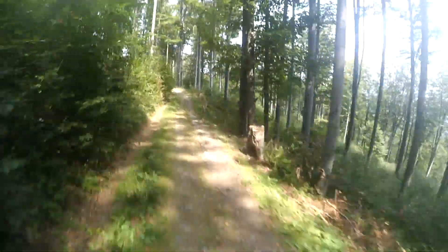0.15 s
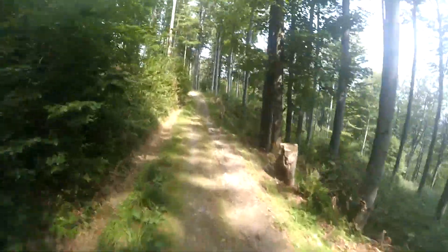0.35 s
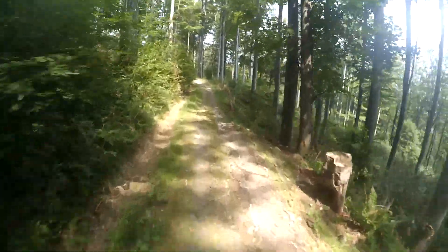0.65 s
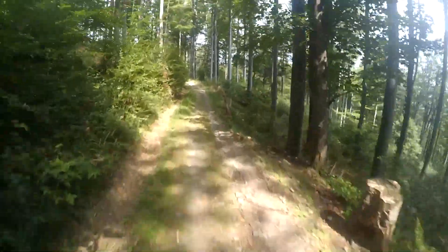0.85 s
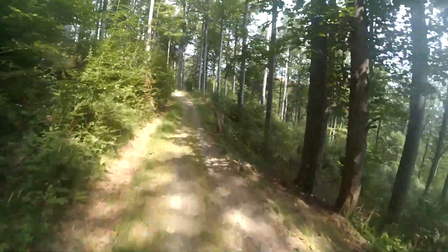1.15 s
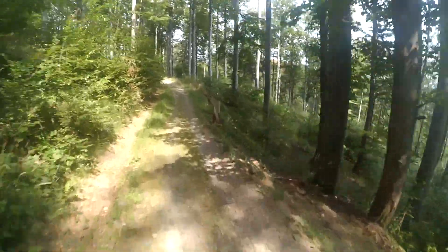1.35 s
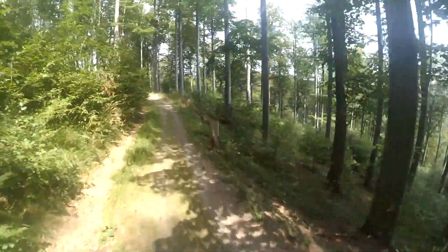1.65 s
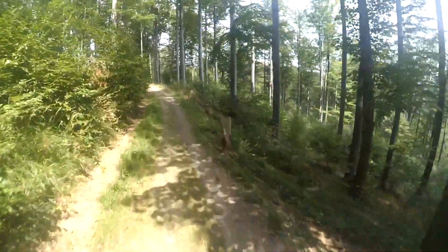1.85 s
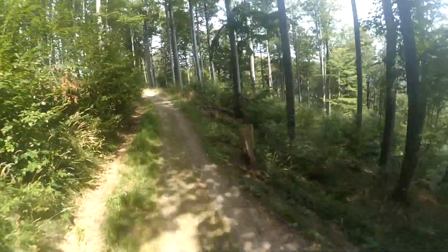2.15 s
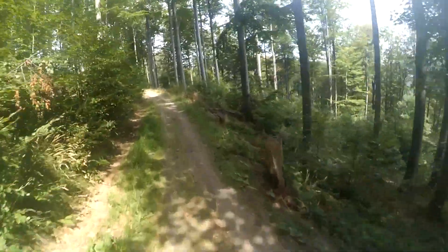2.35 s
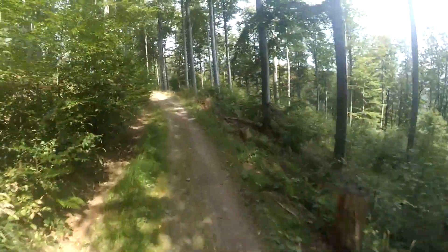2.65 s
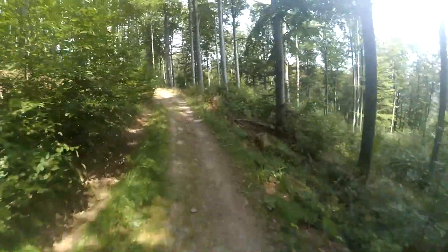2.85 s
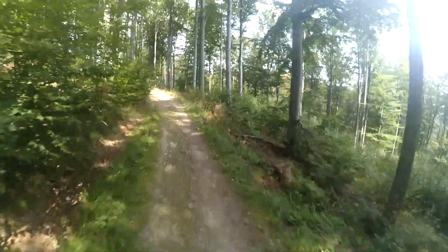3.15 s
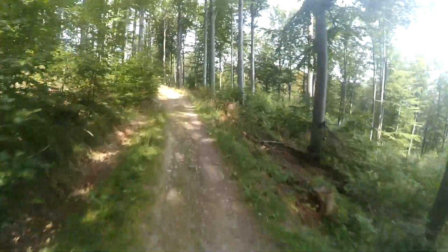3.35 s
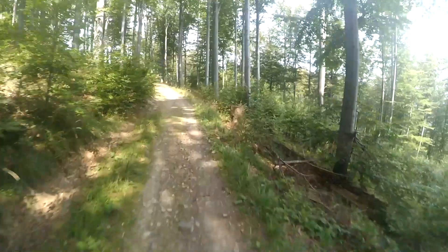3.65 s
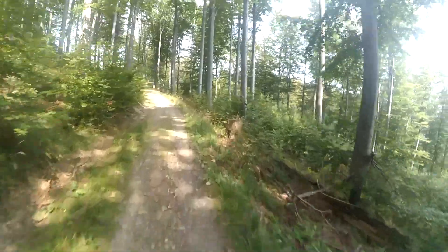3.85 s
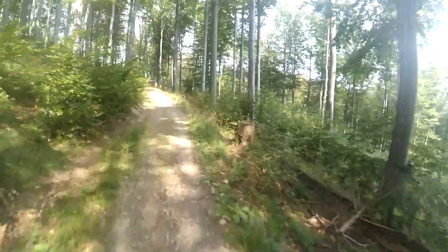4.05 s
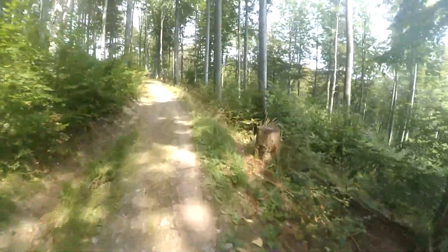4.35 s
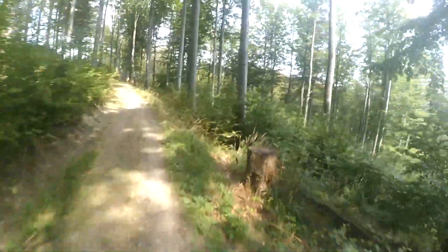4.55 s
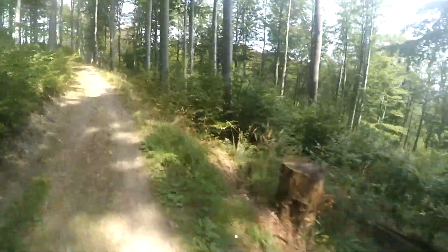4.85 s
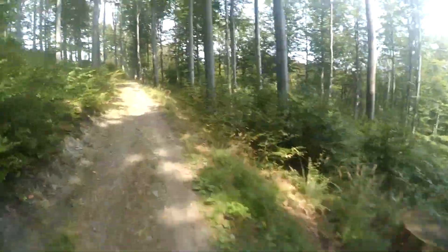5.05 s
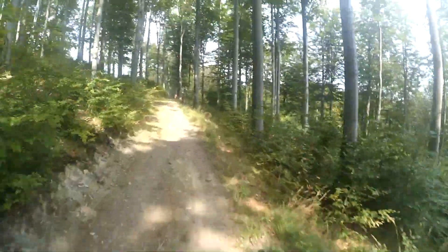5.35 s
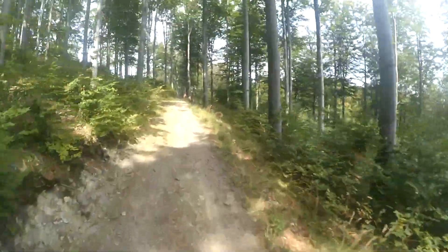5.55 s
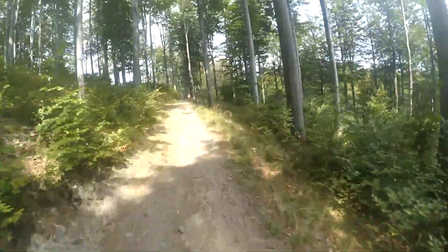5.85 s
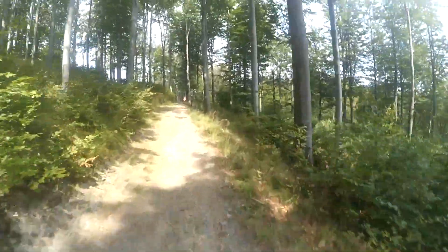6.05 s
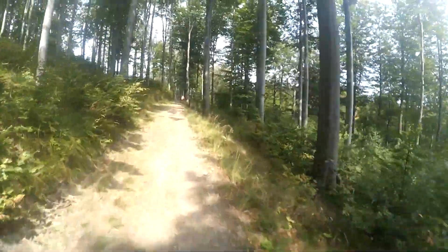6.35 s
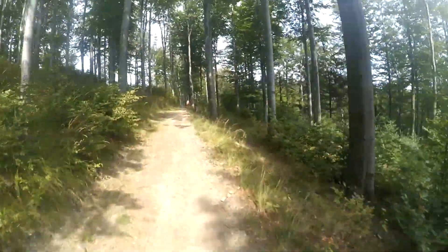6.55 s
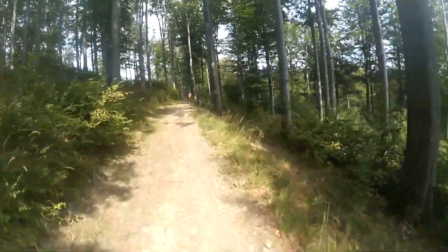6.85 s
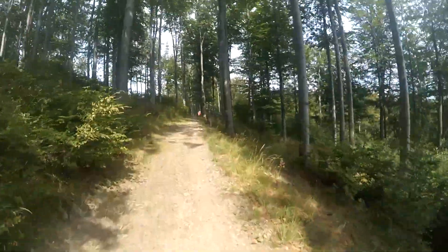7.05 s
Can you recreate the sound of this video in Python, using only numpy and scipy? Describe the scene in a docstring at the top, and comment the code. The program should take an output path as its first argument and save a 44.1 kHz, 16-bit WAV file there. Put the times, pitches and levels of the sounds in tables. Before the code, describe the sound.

Muffled tyre roar on gravel, with small knocks, pings and bumps from a moving mountain bike and deep wind buffeting underneath.

```python
"""On a gravel trail, a mountain bike rolls downhill, heard from inside a closed plastic case fixed to it.
Knobbly tyres roar on the grit, and the case colours that roar with its own ringing pitches.
Loose stones and parts knock, tick and ping, and bumps jolt the case. Underneath, wind rumbles and the
mount that holds the case sways and shudders, mostly too low to hear.
In the background are a soft hiss and a faint bright chirr that comes and goes at uneven gaps."""
import sys
import numpy as np
from scipy import signal
from scipy.fft import rfft, irfft
from scipy.io import wavfile
from scipy.ndimage import uniform_filter1d

SR = 44100
rng = np.random.default_rng(int(sys.argv[2]) if len(sys.argv) > 2 else 0)


def dump(signal):
    """Clip the signal to [-1, 1] and save it as 16-bit WAV at the path in sys.argv[1]."""
    limited = np.clip(np.atleast_2d(signal).T, -1, 1)
    pcm = np.round(limited * 32767).astype(np.int16)
    wavfile.write(sys.argv[1], SR, pcm)


N = 317564   # samples: about 7.2 seconds


def from_db(db):
    """Turn decibels into a number to multiply by."""
    return 10 ** (np.asarray(db) / 20)


def rms_one(x):
    """Scale a signal so that its average strength (rms) is 1."""
    return x / np.sqrt(np.mean(x ** 2) + 1e-20)


def curves(rows):
    """Join a table's timed points with straight lines: one curve for each column after the time."""
    times, *columns = np.transpose(rows)
    return [np.interp(np.arange(N) / SR, times, column) for column in columns]


def drift(rate_hz):
    """A smooth random wander of about 1 either way; a higher rate wanders faster."""
    r = np.exp(-80 * np.pi * rate_hz / SR)
    slow = signal.lfilter([1], [1, -2 * r, r * r], rng.standard_normal(N // 40 + 2002))[2000:]
    return np.interp(np.arange(N) / 40, np.arange(len(slow)), rms_one(slow))


def colour(x, spectrum, rings=()):
    """Shape a sound's lows and highs to a spectrum, with a boost at each ringing pitch."""
    size = 16384
    hz = np.arange(size // 2 + 1) * SR / size + 1
    hz_points, db_points = np.transpose(spectrum)
    db = np.interp(np.log(hz), np.log(np.r_[1, hz_points, SR]), np.r_[-120, db_points, db_points[-1] - 20])
    for centre_hz, width_hz, boost_db in rings:
        db += boost_db / (1 + (2 * (hz - centre_hz) / width_hz) ** 2)
    # Make the filter ring only after a click, never before it (minimum phase).
    cepstrum = irfft(np.log(from_db(db)))
    cepstrum[1:size // 2] *= 2
    cepstrum[size // 2 + 1:] = 0
    response = irfft(np.exp(rfft(cepstrum)))
    return signal.fftconvolve(x, response / np.sqrt(np.sum(response ** 2)))[:len(x)]


def ring(x, hz, width_hz):
    """Make a sound ring near one pitch; a smaller width rings longer."""
    r = np.exp(-np.pi * width_hz / SR)
    feedback = [1, -2 * r * np.cos(2 * np.pi * hz / SR), r * r]
    return signal.lfilter(np.array([1, 0, -1]) * (1 - r * r) / 2, feedback, x)


def ring_twice(x, hz, width_hz):
    """Two rings in a row let less through on either side of the pitch."""
    return ring(ring(x, hz, width_hz), hz, width_hz)


def grains(per_s, spread_db):
    """Random clicks of uneven size."""
    sizes = from_db(spread_db * np.minimum(rng.exponential(1, N), 5)) * rng.choice([-1, 1], N)
    return rms_one(sizes * (rng.random(N) < per_s / SR))


# The tone of the hiss: (pitch [Hz], relative level [dB])
HISS_SPECTRUM = [(3000, 4), (5000, 7.5), (8000, 0), (12500, -5), (13100, -46), (15000, -36)]

def hiss(effort_db):
    """Air, fine grit and the microphone hiss softly, louder when the tyres work harder."""
    slow_db = uniform_filter1d(effort_db, size=20000)
    level_db = -76 + 0.93 * (slow_db - slow_db.mean()) + 2 * drift(13)
    return from_db(level_db) * colour(rng.standard_normal(N), HISS_SPECTRUM)


# When the chirr sounds: (start [s], length [s], level [dB])
CHIRR_SPELLS = [(.148, 0.087, -79), (.298, .097, -77), (.468, 0.1, -76), (0.658, .1, -77),
                (0.785, 0.12, -71.5), (1.045, .09, -78), (1.198, .09, -78), (1.358, 0.083, -78),
                (1.578, .04, -83), (1.76, .035, -83), (1.955, 0.029, -83), (2.148, 0.033, -79),
                (2.3, .045, -78), (2.48, .035, -78), (2.695, .06, -79), (2.865, .04, -81),
                (3.088, .035, -78), (3.238, .045, -81), (3.468, .04, -83), (3.648, .03, -78),
                (3.946, .04, -78), (4.03, .035, -79), (4.188, .035, -79), (4.37, .06, -79),
                (4.548, 0.11, -76), (4.748, .097, -78), (4.948, .095, -76), (5.148, .09, -76),
                (5.338, .097, -76), (5.51, 0.084, -76), (5.652, .095, -75), (5.888, .085, -76),
                (6.038, .025, -82), (6.275, .045, -79), (6.44, .05, -81), (6.658, .045, -81),
                (6.828, .05, -78), (7.038, .035, -79)]
# Its bright rings: (pitch [Hz], width [Hz], relative level [dB], base level between chirrs [dB])
CHIRR_RINGS = [(7030, 340, -1.5, -84), (8270, 610, -3, -81.5), (9340, 650, -6, -87),
               (11050, 500, -2.5, -83), (11950, 720, -1, -88.5), (13700, 1000, 1, -105)]

def chirr():
    """Short, ragged runs of tiny clicks ring at several high pitches, each flickering on its own."""
    gate = np.zeros(N)
    for start, length, db in CHIRR_SPELLS:
        gate[round(start * SR):round((start + length) * SR)] = from_db(db)
    gate = uniform_filter1d(gate, size=300)   # soften each start and stop
    clicks = from_db(2 * drift(45)) * grains(per_s=2500, spread_db=1.8)
    out = np.zeros(N)
    for hz, width_hz, db, rest_db in CHIRR_RINGS:
        flicker = from_db(db - 5.5 + 1.5 * drift(40))
        out += (gate + from_db(rest_db)) * flicker * rms_one(ring_twice(clicks, hz, width_hz))
    return out


# Gusts of wind that hit the case: (time [s], level [dB])
WIND_GUSTS = [(0.02, -34), (0.14, -52), (0.2, -51), (0.38, -31), (0.46, -47), (0.63, -39), (0.67, -50),
              (0.69, -47), (0.81, -32), (0.93, -47), (0.97, -38), (1.09, -42), (1.15, -50), (1.27, -44),
              (1.49, -43.5), (1.53, -33), (1.61, -45), (1.75, -35), (1.83, -54), (2.02, -42), (2.18, -52),
              (2.22, -43), (2.26, -55), (2.32, -38), (2.46, -53), (2.56, -42), (2.62, -52), (2.72, -40),
              (2.76, -47), (2.8, -41), (3.14, -52), (3.18, -41), (3.33, -46), (3.81, -58), (3.85, -41),
              (4.13, -67), (4.29, -46), (4.69, -48), (4.81, -42), (4.87, -50), (4.98, -51), (5.02, -38),
              (5.1, -51), (5.22, -42), (5.44, -51), (5.72, -47), (5.82, -61), (5.88, -45), (5.92, -56),
              (6.13, -46), (6.17, -58), (6.21, -44), (6.37, -57), (6.41, -48), (6.57, -48), (6.83, -42.5),
              (6.87, -52), (6.93, -47), (6.97, -53), (7.15, -45)]

def wind():
    """Gusts shake the mount at a deep pitch of its own."""
    gust_db, = curves(WIND_GUSTS)
    shaking = ring_twice(rng.standard_normal(N), hz=40.7, width_hz=28)
    return from_db(gust_db - 2.5) * rms_one(shaking)


# The tone of the rumble: (pitch [Hz], relative level [dB])
RUMBLE_SPECTRUM = [(12, -13), (22, -8), (40, -10), (55, -11), (75, -9.5), (128, -13), (205, -24.5),
                   (348, -29.5), (420, -43), (550, -79)]

def rumble(level_db):
    """Wind and the bike's frame make a low, lumpy noise."""
    lumps = from_db(0.68 * drift(34)) * rng.standard_normal(N)
    return from_db(level_db) * rms_one(colour(lumps, RUMBLE_SPECTRUM, rings=[(121, 25, 6.1)]))


# Thuds as the wheels take a bump: (time [s], peak level [dB])
WHEEL_THUDS = [(0.088, -16), (.27, -20), (.36, -21.5), (.53, -25), (.64, -21.5), (.73, -36), (.82, -19),
               (1.04, -18), (1.26, -31), (1.5, -29), (1.74, -31), (1.88, -38), (2.02, -30), (2.19, -21),
               (2.36, -23), (2.48, -22), (2.6, -34), (2.72, -25.5), (2.82, -21.5), (2.92, -29), (3.17, -23),
               (3.4, -27.5), (3.93, -33), (4.15, -31.5), (4.33, -20), (4.53, -31), (4.66, -31), (4.8, -25),
               (5.15, -24), (5.24, -24), (5.35, -28), (5.62, -43), (5.94, -49), (6.08, -25), (6.239, -32),
               (6.401, -24), (6.77, -23), (7.1, -30)]

def shudder_level(rest_db=-42, rise_db_per_s=288.5, fall_db_per_s=299):
    """How hard the mount shudders, in dB: each thud swells fast and dies back to a faint tremble."""
    t = np.arange(0, N + 100, 100) / SR
    power = from_db(2 * rest_db)   # doubling the dB gives power, which can be added up
    for time, peak_db in WHEEL_THUDS:
        below_peak_db = np.maximum(rise_db_per_s * (time - t), fall_db_per_s * (t - time))
        power = power + from_db(2 * (peak_db - below_peak_db))
    return np.interp(np.arange(N) / SR, t, 10 * np.log10(power))


def wobble(hz, wander, wander_hz):
    """A spring swings near its own pace while uneven ground pushes it faster and slower."""
    pace_hz = hz * np.exp(wander * drift(wander_hz))
    return np.sqrt(2) * np.sin(2 * np.pi * (np.cumsum(pace_hz) / SR + rng.random()))


# How hard the mount moves: (time [s], sway level [dB], rumble level [dB])
MOUNT_LEVELS = [(0.04, -14, -46.5), (0.17, -21.5, -57.5), (0.34, -11, -48), (0.5, -17.5, -49.5),
                (0.75, -17.5, -48.5), (0.83, -14, -48), (0.97, -22.5, -49.5), (1.05, -8, -58),
                (1.15, -21, -53), (1.37, -27.5, -54), (1.46, -13, -53), (1.54, -14.5, -66),
                (1.63, -30.5, -49.5), (1.74, -13, -62), (1.84, -27.5, -57), (2.28, -10.5, -55),
                (2.34, -23, -58.5), (2.63, -20, -52.5), (2.69, -35.5, -53.5), (2.79, -19.5, -51),
                (3.25, -23, -50), (3.46, -45.5, -53), (3.66, -30.5, -48), (3.96, -19, -59),
                (4.06, -38.5, -51.5), (4.22, -31.5, -56), (4.3, -26, -50), (4.4, -20.5, -53),
                (4.73, -20.5, -54), (4.83, -15, -41.5), (4.95, -22, -58), (5.23, -15, -48),
                (5.35, -39, -60), (5.39, -22, -53.5), (5.72, -24.5, -55), (5.93, -33, -54),
                (6.2, -26.5, -52.5), (6.42, -27, -53.5), (6.52, -31.5, -60.5), (6.63, -17.5, -53),
                (6.73, -22, -55), (6.9, -22, -51), (7.15, -21, -62.5)]

def mount(travel=0.46):
    """The springy mount lurches, sways and shudders, with the wind and the rumble on top."""
    sway_db, rumble_db = curves(MOUNT_LEVELS)
    rumble_db += drift(6.8)   # the drifts here are the unevenness of the ground
    shudder_db = shudder_level() + 2.5 * drift(22)
    quick_db = shudder_db - uniform_filter1d(shudder_db, size=20000)   # the shudder's fast changes
    sway_db += 0.3 * quick_db + 1.5 * drift(8.6)
    rumble_db += 0.11 * quick_db
    lurch = from_db(-6) * rms_one(ring_twice(rng.standard_normal(N), hz=7.04, width_hz=5.7))
    sway = wobble(hz=10.5, wander=0.2, wander_hz=2.96)
    shudder = wobble(hz=22.48, wander=0.27, wander_hz=5.88)
    swing = from_db(sway_db) * (sway + lurch) + from_db(shudder_db) * shudder
    swing = travel * np.tanh(swing / travel)   # it rounds off near the end of its travel
    swing = signal.sosfilt(signal.butter(4, 34, fs=SR, output="sos"), swing)   # its mass smooths it
    return swing + wind() + rumble(rumble_db)


# Bumps: (time [s], level [dB], direction [+1 or -1], length [s], level of the frame's ring [dB])
BUMPS = [(.3385, -55, -1, .003, -40), (0.366, -26, 1, 0.0016, -65), (0.526, -31, 1, 0.0041, -34),
         (.6253, -31, 1, 0.0069, -40), (.8225, -25.5, 1, 0.0039, -47), (1.0571, -26, 1, 0.0027, -33),
         (1.547, -36.5, 1, 0.0034, -39), (1.7314, -29, 1, 0.0034, -38.5), (2.22, -38, 1, 0.0023, -35.5),
         (2.322, -36.5, 1, 0.0027, -66), (4.8095, -27.5, -1, 0.0034, -19), (5.232, -27, 1, 0.003, -49),
         (6.828, -35, 1, 0.0037, -65)]
# How the frame rings after a bump: (pitch [Hz], time to fade by 60 dB [s], relative level [dB])
FRAME_RINGS = [(140.5, 0.14, -12), (346, 0.097, -19)]

def jolts():
    """The case hits its stop: the pressure builds, flips quickly and settles, and the frame rings on."""
    out, blows = np.zeros(N), np.zeros(N)
    t = np.arange(-1000, 1000) / SR
    for time, db, direction, length, ring_db in BUMPS:
        at = round(time * SR)
        flip = np.tanh(t / (0.25 * length)) * np.exp(-np.abs(t) / length)
        out[at - 1000:at + 1000] += direction * from_db(db) * flip
        blows[at] = direction * from_db(ring_db)
    for hz, fade_s, db in FRAME_RINGS:
        r, angle = from_db(-60 / (fade_s * SR)), 2 * np.pi * hz / SR
        ringing = signal.lfilter([0, np.sin(angle)], [1, -2 * r * np.cos(angle), r * r], blows + 1e-18)
        out += from_db(db) * ringing
    return out


# Stones that hit the frame: (time [s], pitch [Hz], level [dB], time to fade by 60 dB [s])
STONE_PINGS = [(.033, 1504, -44.5, .06), (.604, 4000, -52, .025), (.634, 4010, -48, 0.022),
               (.646, 5100, -49, .015), (.656, 3300, -51, .035), (.666, 3850, -54, .025),
               (.781, 3300, -51, .05), (.799, 3570, -54, .08), (.801, 5950, -68, .06),
               (.848, 1870, -39.5, 0.053), (.878, 4020, -47, .035), (.884, 7280, -57, .05),
               (1.991, 3050, -52, .05), (2.054, 3200, -50, 0.059), (2.604, 4000, -59, .04),
               (2.828, 3950, -50, .02), (2.862, 2700, -62, 0.036), (3.045, 2870, -50, .04),
               (3.243, 1990, -44, .03), (2.432, 1890, -45.5, .06), (3.115, 5000, -62, 0.049),
               (4.51, 2580, -52, .05), (4.573, 1544, -44, 0.066), (4.809, 4100, -47, 0.072),
               (4.842, 3520, -60, 0.062), (5.029, 4180, -41, 0.018), (5.384, 3970, -58, .05),
               (5.545, 2060, -49, .04), (5.867, 3400, -59, .05), (6.032, 3500, -50, .025),
               (6.369, 5690, -52, .05), (6.369, 7860, -47, .015), (6.424, 4010, -58, .04),
               (6.507, 4150, -55, .02), (6.615, 3910, -51, .025), (6.744, 4070, -51, .04),
               (6.826, 3000, -51, .05)]

def pings(rise_s=0.00083, size=6000):
    """A stone pings off the frame: one clear note starts quickly and rattles as it dies."""
    out, t = np.zeros(N + size), np.arange(size) / SR
    for time, hz, db, fade_s in STONE_PINGS:
        at = round(time * SR)
        loudness = (1 - np.exp(-t / rise_s)) * from_db(db - 60 * t / fade_s)
        out[at:at + size] += loudness * np.sin(2 * np.pi * (hz * t + rng.random()))
    rattle = from_db(3 * drift(120))
    return out[:N] * rattle


def strike(chatter, length, hz, width_hz):
    """One hard touch, then dying chatter, both ringing near one pitch; the peak is 1."""
    t = np.arange(len(chatter)) / SR
    burst = chatter * np.exp(-t / max(length, 0.0003))
    burst[0] = 3.3   # the first touch
    rung = ring_twice(burst, hz, width_hz)
    return rung / np.abs(rung).max()


def small_knocks(per_s=4, length=0.004):
    """Faint knocks at random moments, each with its own tone, as extra rows for the table below."""
    draws = rng.random((round(per_s * N / SR), 7))
    dull_db, crunch_db, tick_db, snap_db = ([-59, -57, -59, -67] + 10 * (draws[:, :4] - 0.5)).T
    times = draws[:, 4] * (N - 1) / SR
    crunch_hz, tick_hz = 1450 + 1000 * draws[:, 5], 2700 + 1500 * draws[:, 6]
    lengths = np.full(len(draws), length)
    return list(zip(times, dull_db, crunch_db, crunch_hz, tick_db, tick_hz, snap_db, lengths))


# Knocks of stones and loose parts: (time [s], dull knock level [dB], crunch level [dB],
# crunch pitch [Hz], tick level [dB], tick pitch [Hz], snap level [dB], fade time [s])
LOOSE_KNOCKS = [(0.234, -47, -63, 2110, -54, 3220, -71, 0.0053),
                (.273, -58, -52, 2500, -56, 3700, -56, .005), (0.323, -45, -49, 2520, -49, 3380, -55, .02),
                (0.605, -58, -45, 1830, -52, 4090, -70, 0.0044),
                (0.647, -63, -45, 1990, -50, 3500, -52, 0.0089),
                (0.668, -54, -64, 2260, -53, 4000, -65, .005),
                (0.784, -46, -50, 2260, -53, 2930, -52, 0.015),
                (0.799, -51, -43, 1520, -49, 3470, -50, 0.024),
                (0.85, -59, -49, 1840, -52, 4060, -52, 0.01),
                (0.881, -62, -50, 1810, -52, 4100, -47, 0.016),
                (0.98, -58, -48, 1590, -51, 4000, -56, 0.0097),
                (1.035, -44, -42, 1490, -52, 3800, -61, .02), (1.119, -62, -63, 1810, -52, 3010, -54, .005),
                (1.323, -58, -55, 2400, -48, 3320, -62, .004),
                (1.698, -43, -60, 1660, -56, 3960, -67, 0.0064),
                (2.36, -59, -46, 1860, -54, 2900, -52, 0.0059),
                (2.55, -61, -44, 1820, -49, 3670, -50.5, 0.0077),
                (2.744, -46, -39, 1400, -53, 3400, -73, 0.0073),
                (3.429, -64, -43, 1620, -58, 2480, -69, 0.0044),
                (3.527, -34, -38.5, 1780, -55, 4840, -73, 0.0065),
                (3.554, -57, -39, 1560, -65, 2820, -77, .005),
                (3.685, -58, -37, 1660, -70, 2950, -73, 0.0066),
                (3.729, -60, -52, 1600, -55, 3400, -52, .003),
                (4.231, -63, -61, 2200, -56, 4000, -64, .004),
                (4.263, -48, -39, 1550, -51.5, 3720, -64, 0.0067),
                (4.351, -63, -45, 1960, -54, 3210, -69, .004),
                (4.375, -61, -44, 1770, -49, 3340, -54, 0.0046),
                (4.52, -48, -43, 1560, -60, 2560, -77, 0.011),
                (4.585, -45, -44, 2000, -67, 2670, -74, 0.013),
                (4.731, -55, -38.5, 1480, -72, 3080, -77, 0.0067),
                (4.752, -47, -42, 2000, -68, 3290, -71, 0.0071),
                (4.81, -40, -32, 1710, -44, 3900, -62, 0.0096),
                (4.85, -60, -49, 1510, -53, 3570, -77, .005),
                (4.896, -51, -42, 1710, -66, 2540, -74, 0.0046),
                (4.921, -51, -59, 2300, -62, 4540, -60, 0.004),
                (5.012, -48, -52, 2200, -64, 3780, -52, .004),
                (5.029, -45, -41.5, 2680, -39, 3170, -45.5, 0.0025),
                (5.101, -62, -48, 1950, -62, 3300, -57, .005),
                (5.142, -50, -41, 1600, -59, 4630, -58, 0.012),
                (5.195, -48, -50, 2020, -53, 3850, -62, 0.008),
                (5.213, -44, -44.5, 2400, -63, 4700, -71, 0.0043),
                (5.239, -56, -37.5, 1540, -68, 2520, -73, 0.0049),
                (5.356, -65, -48, 1920, -57, 3880, -64, 0.009),
                (5.386, -57, -50, 2360, -54, 2900, -56, .0061),
                (5.816, -45, -40.5, 1660, -72, 2950, -70, 0.012),
                (6.188, -61, -38, 1720, -73, 2520, -73, 0.003),
                (6.209, -49, -43, 1980, -68, 2560, -78, 0.003),
                (6.369, -60, -46, 1820, -72, 4540, -39.5, 0.0041),
                (6.428, -53, -45, 2180, -56, 4010, -74, 0.0055),
                (6.529, -69, -61, 2200, -52, 3580, -48, 0.0026),
                (6.719, -49, -46, 1610, -55, 4070, -68, 0.0075),
                (6.746, -66, -40.5, 1790, -54, 3800, -40.5, 0.0061),
                (6.79, -45, -47, 2330, -45, 3430, -62, 0.008),
                (6.803, -43, -41, 2130, -59, 2970, -76, 0.015),
                (6.824, -33, -30, 1510, -43, 3970, -45.5, 0.005),
                (6.832, -50, -36.5, 1660, -52, 2950, -49.5, 0.022),
                (6.878, -47, -36.5, 1530, -60, 3600, -65, 0.015),
                (6.897, -61, -50, 1720, -65, 4000, -54, 0.012),
                (7.135, -49, -42.5, 1840, -66, 3200, -76, 0.0056),
                (7.156, -44, -40.5, 1840, -66, 3490, -64, 0.0044)]

def knocks(size=2200, hard_snap_db=-40.5):
    """Each hit is a dull knock in the case, a crunch, a tick with a metal clink, and a short snap."""
    out = np.zeros(N)
    rows = LOOSE_KNOCKS + small_knocks()
    for time, dull_db, crunch_db, crunch_hz, tick_db, tick_hz, snap_db, length in rows:
        chatter = rng.standard_normal(size)
        dull = from_db(dull_db) * strike(chatter, length, hz=1120, width_hz=244)
        crunch = from_db(crunch_db) * strike(chatter, length, crunch_hz, width_hz=800)
        tick = from_db(tick_db) * strike(chatter, length, tick_hz, width_hz=810)
        clink = from_db(tick_db - 12) * strike(chatter, 0.29 * length, tick_hz, width_hz=200)
        snap = from_db(snap_db) * strike(chatter, 0.63 * length, hz=5060, width_hz=2330)
        # The spit is the very top of the snap; light hits have much less of it.
        spit_db = snap_db - 5 + 1.3 * (snap_db - hard_snap_db)
        spit = from_db(spit_db) * strike(chatter, 0.44 * length, hz=12400, width_hz=6200)
        at = round(time * SR)
        out[at:at + size] += (dull + crunch + tick + clink + snap + spit)[:N - at]
    return out


def pebbles():
    """Flicked pebbles clack in sprays, each ringing briefly at one of twelve pitches."""
    clicks = grains(per_s=400, spread_db=2.2)
    pitch_choice = rng.integers(0, 12, N)
    clicks *= from_db(4 * drift(7.8))   # the sprays
    out = np.zeros(N)
    for k, hz in enumerate(np.geomspace(1500, 4200, 12)):
        gain = from_db(-7 * np.log2(hz / 1500))   # smaller stones are higher and quieter
        out += gain * ring_twice(clicks * (pitch_choice == k) + 1e-18, hz, width_hz=hz / 6)
    return rms_one(out)


# How hard the tyres work the gravel: (time [s], effort [dB], whirr level [dB])
TYRE_EFFORT = [(0.04, -44.5, -51.5), (0.06, -49.5, -55), (0.3, -47.5, -50), (0.55, -48, -55),
               (1.01, -47.5, -49.5), (1.44, -49, -54), (1.68, -46.5, -48.5), (1.8, -49.5, -52.5),
               (2.16, -48.5, -52.5), (2.61, -51.5, -55), (2.67, -49, -52), (3.5, -51.5, -56.5),
               (3.52, -48, -48), (3.56, -50.5, -54), (3.94, -54, -56.5), (4.53, -51.5, -55),
               (4.61, -47, -49), (4.65, -56, -56.5), (4.81, -48, -50.5), (4.85, -51, -55),
               (4.93, -54, -60.5), (5.1, -50, -54.5), (5.25, -48.5, -51), (5.33, -53.5, -56),
               (5.5, -53.5, -60.5), (5.78, -53, -57.5), (5.95, -54.5, -54), (6.1, -52, -54.5),
               (6.2, -53.5, -56.5), (6.32, -51.5, -55.5), (6.7, -52.5, -59), (6.77, -50.5, -58),
               (6.83, -48, -60), (6.87, -50.5, -57), (7.15, -53.5, -58.5)]
# The tone of the knobs beating the ground: (pitch [Hz], relative level [dB])
ROAR_SPECTRUM = [(300, -10), (480, -15), (880, -14), (1200, -4.5), (1600, -22.5), (2000, -31),
                 (2500, -30.5)]
# The tone of small stones cracking: (pitch [Hz], relative level [dB])
GRIT_SPECTRUM = [(1100, -6.5), (1500, 2.5), (2050, -6), (2400, -6), (3600, -7.5), (4300, -16),
                 (6000, -19.5), (8000, -40), (11000, -49.5)]
# Where the plastic case rings: (pitch [Hz], width [Hz], boost [dB])
CASE_RINGS = [(359, 15.7, 8), (640, 219, 11.5), (1017, 128, 7.5), (1950, 300, 7.5), (2744, 340, 5),
              (3290, 260, 4), (4060, 43, 7)]

def tyres():
    """Rubber knobs beat the ground (roar), the case rings along (whirr) and small stones crack (grit)."""
    effort_db, whirr_db = curves(TYRE_EFFORT)
    effort_db -= effort_db.mean()
    roar_db, grit_db = -55 + 0.58 * effort_db, -58 + 0.9 * effort_db
    whirr_db += 0.8 * drift(4.7)
    rough_patches = drift(15.7)   # these shake all three sounds together
    beats = from_db(1.03 * rough_patches) * grains(per_s=6000, spread_db=2.58)
    cracks = from_db(0.75 * rough_patches + 0.61 * drift(30)) * grains(per_s=12000, spread_db=0.67)
    roar = rms_one(colour(beats, ROAR_SPECTRUM, CASE_RINGS))
    # The case rings most strongly at a close pair of pitches.
    whirr = rms_one(ring(ring(beats, hz=1290, width_hz=85), hz=1345, width_hz=85))
    grit = rms_one(colour(cracks, GRIT_SPECTRUM, CASE_RINGS)) + from_db(-8) * pebbles()
    return from_db(roar_db) * roar + from_db(whirr_db) * whirr + from_db(grit_db) * grit


def scene():
    """Add all the sounds of the ride into one channel."""
    effort_db, _ = curves(TYRE_EFFORT)
    return (hiss(effort_db) + mount() + jolts() + tyres() + knocks() + pings() + chirr())[None]


def record(dry, cutoff_hz=15300):
    """Cut away the very highest treble."""
    return signal.sosfilt(signal.cheby2(22, 60, cutoff_hz, fs=SR, output="sos"), dry)


dry = scene()
out = record(dry)
dump(out)
```